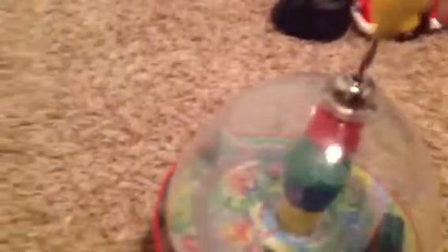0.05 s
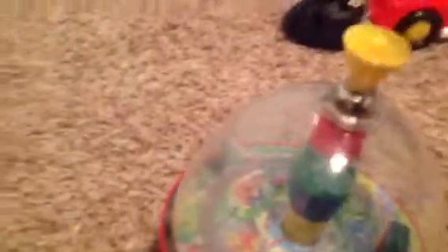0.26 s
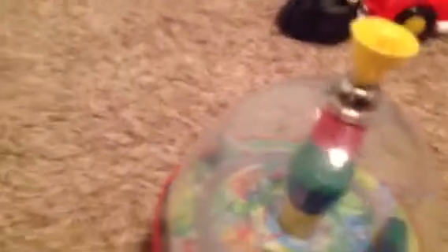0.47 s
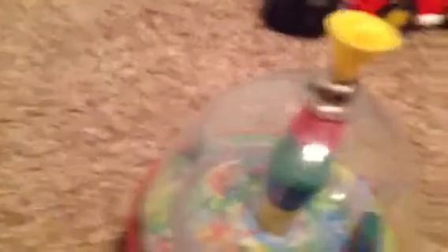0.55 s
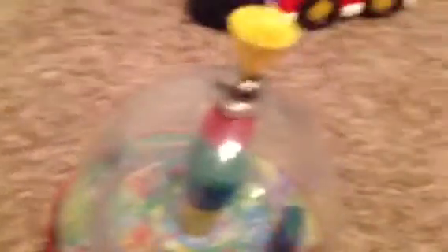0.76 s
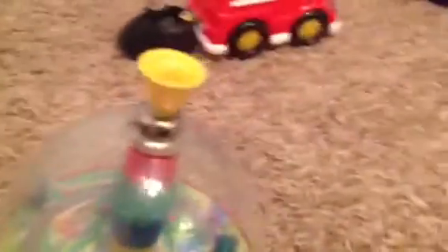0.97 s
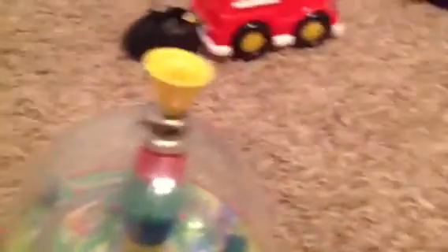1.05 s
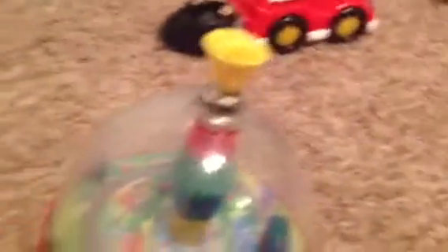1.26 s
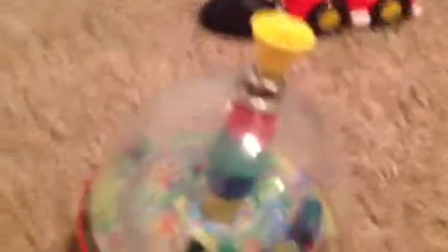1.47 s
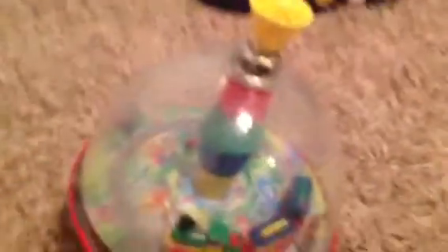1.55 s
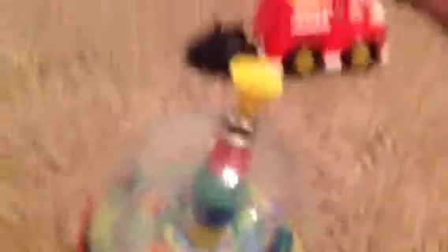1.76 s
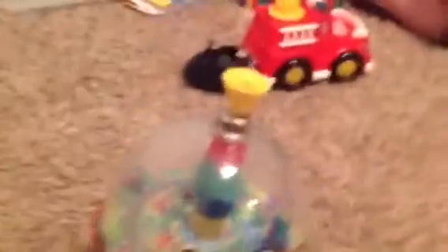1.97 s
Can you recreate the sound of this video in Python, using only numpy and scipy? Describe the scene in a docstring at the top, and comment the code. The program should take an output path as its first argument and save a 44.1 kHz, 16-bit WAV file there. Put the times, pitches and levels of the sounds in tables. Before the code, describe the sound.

Brief metallic clatter of a toy top's rod and handle, then faint whirring and soft bumps.

```python
"""A toy spinning top on a carpet, close by in a small room. Its twisted metal rod scrapes down through
the collar by stick-slip friction, then the handle knocks home and excites the modes of the plastic dome.
The rod rings in its bending modes and rattles loose in the collar. The top whirrs on faintly,
with scuffs on the carpet, soft bumps and small ticks, over a quiet background with a low hum."""
import sys
import numpy as np
from scipy import signal
from scipy.fft import rfft, irfft
from scipy.io import wavfile

SR = 44100
rng = np.random.default_rng(int(sys.argv[2]) if len(sys.argv) > 2 else 0)


def dump_mix(stems):
    """Bounce the given channels to the path in sys.argv[1] as a 16-bit WAV at rate SR."""
    frames = np.atleast_2d(stems).T  # one column per channel
    limited = np.clip(frames, -1, 1)  # hard clip at full scale
    pcm = np.round(limited * 32767).astype(np.int16)
    wavfile.write(sys.argv[1], SR, pcm)


N = 88200
SOFT_RISE_S = 0.0021


def undb(db):
    """Amplitude ratio of a level in decibels."""
    return 10 ** (np.asarray(db) / 20)


def unit(x):
    """Normalisation to a standard deviation of 1."""
    return x / (np.std(x) + 1e-12)


def times():
    """Uniform sampling: the time of each sample in seconds."""
    return np.arange(N) / SR


def envelope(points):
    """Gain interpolated in decibels through (time_s, level_db) points."""
    return undb(np.interp(times(), *np.array(points).T))


def colour(x, points):
    """Minimum-phase filter through (frequency_hz, gain_db) points, scaled to keep white noise's power."""
    hz, db = np.array(points).T
    bins_hz = np.arange(N + 1) * SR / (2 * N)
    gain = undb(np.interp(np.log(bins_hz + 1), np.log(hz), db))
    cepstrum = irfft(np.log(gain / np.sqrt(np.mean(gain ** 2))))
    cepstrum[1:N] *= 2  # folding the cepstrum makes the filter causal
    cepstrum[N + 1:] = 0
    return irfft(rfft(x, 2 * N) * np.exp(rfft(cepstrum)))[:N]


def noise_band(hz, width_hz):
    """Noise through one resonance; centred on 0 Hz it is a random fluctuation."""
    bins_hz = np.arange(N // 2 + 1) * SR / N
    spectrum = rfft(rng.standard_normal(N)) / (1 + (2 * (bins_hz - hz) / width_hz) ** 2)
    return unit(irfft(spectrum, N))


def decay(start, t60, hold=0, rise=1 / SR):
    """Exponential damping, 60 dB in t60 seconds, with a linear attack and a hold."""
    age = times() - start
    return np.clip(age / rise, 0, 1) * np.exp(-np.log(1000) * np.maximum(age - hold, 0) / t60)


def damped_tone(start, hz, t60):
    """A damped oscillator, pushed softly from rest."""
    return decay(start, t60, rise=SOFT_RISE_S) * np.sin(2 * np.pi * hz * (times() - start))


def ring(start, modes, hold=0, rise=1 / SR, detune=0.0043):
    """Modal superposition: half a second of damped modes in random phases, each slightly detuned."""
    first, out = int(start * SR), np.zeros(N)
    age = np.arange(SR // 2) / SR
    for hz, db, t60 in modes:
        cycles = hz * (1 + detune * rng.standard_normal()) * age + rng.random()
        shape = decay(0, t60, hold, rise)[:len(age)]
        out[first:first + len(age)] += undb(db) * shape * np.sin(2 * np.pi * cycles)
    return out


# Spectrum of the background noise: frequency_hz, gain_db
BACKGROUND_SPECTRUM = [(54, -52.5), (121, -3.5), (415, 0), (573, -0.5), (1180, -10.5), (2400, -15.5),
                       (3930, -16), (8320, -19), (15000, -28.5)]

def background():
    """Stationary noise: a quiet broadband floor and a narrow band heard as a low hum."""
    floor = undb(-57.5) * colour(rng.standard_normal(N), BACKGROUND_SPECTRUM)
    return floor + undb(-74.5) * noise_band(hz=120.8, width_hz=5.3)


def room(x, tail_db=-11):
    """Reverberation: convolution adds the short diffuse tail of a furnished room to the direct sound."""
    diffuse = colour(rng.standard_normal(N), [(200, -2), (3000, -5.5), (14000, -2.5)])
    tail = diffuse * decay(start=0.006, t60=0.31)
    tail /= np.sqrt(np.sum(tail ** 2))
    return x + undb(tail_db) * signal.fftconvolve(x, tail)[:N]


# Resonances of the spinning body: centre_hz, width_hz, level_db
BODY_RESONANCES = [(554, 163, -3.5), (900, 450, -9), (2870, 1900, -8.5)]
# Envelope of the whirr: time_s, level_db
WHIRR_LEVELS = [(0, -78), (0.5, -53.5), (0.9, -52.5), (1.02, -66), (1.2, -54), (1.42, -56), (1.7, -58.5),
                (2.0, -99)]

def whirr(rotation_hz=21.8, throb_db=1.5):
    """Amplitude modulation: the body hums in a few resonances and throbs as it turns."""
    hum = sum(undb(db) * noise_band(hz, width) for hz, width, db in BODY_RESONANCES)
    throb = undb(throb_db * noise_band(rotation_hz, width_hz=4.6))
    return hum * envelope(WHIRR_LEVELS) * throb


def brush(peak, db, rise, fall, spectrum, fibres_per_s=11000, tuft_db=2):
    """Shot noise: carpet fibres flick past, tuft by tuft, in one swell."""
    age = times() - peak
    swell = undb(db) * np.exp(-np.maximum(-age / rise, age / fall))
    fibres = rng.standard_normal(N) * (rng.random(N) < fibres_per_s / SR)
    tufts = undb(tuft_db * noise_band(0, width_hz=197))
    return colour(swell * unit(fibres * tufts), spectrum)


# Light rustles of the carpet: peak_s, level_db, rise_s, fall_s
RUSTLE_SWELLS = [(0.947, -52, 0.043, 0.034), (1.801, -52, 0.0098, 0.015), (1.86, -53, 0.044, 0.046)]
# Spectrum of a rustle: frequency_hz, gain_db
RUSTLE_SPECTRUM = [(500, 4), (3000, 1.5), (9000, -4), (15000, -14)]

def rustles():
    """Broadband friction noise: faint swells of brushed fibres that reach into the high treble."""
    return sum(brush(*swell, RUSTLE_SPECTRUM) for swell in RUSTLE_SWELLS)


# Scuffs on the carpet: peak_s, level_db, rise_s, fall_s, centre_hz
SCUFF_SWELLS = [(0.768, -50, 0.096, 0.048, 2900), (1.051, -51.5, 0.0093, 0.033, 2430),
                (1.102, -41.5, 0.0039, 0.014, 2100), (1.117, -39.5, 0.011, 0.024, 2000),
                (1.326, -47.5, 0.0066, 0.049, 2110)]
# Spectrum of a scuff: ratio_to_centre, gain_db
SCUFF_SPECTRUM = [(.1, -6.5), (.4, -4), (.7, 5), (1.6, 1), (2.4, -10.5), (4.5, -21), (7, -32)]

def scuffs():
    """Band-shaped friction noise: each scuff scales one spectrum to its own centre frequency."""
    return sum(brush(*swell, [(centre_hz * ratio, db) for ratio, db in SCUFF_SPECTRUM])
               for *swell, centre_hz in SCUFF_SWELLS)


# Soft bumps on the carpet: start_s, level_db, pitch_hz, t60_s
CARPET_BUMPS = [(0.937, -42.5, 223, 0.12), (1.047, -38, 345, 0.045), (1.061, -45, 210, 0.064),
                (1.087, -40.5, 407, 0.19), (1.103, -42.5, 210, 0.13), (1.221, -31, 286, 0.039),
                (1.516, -23, 135, 0.032), (1.5221, -25.5, 241, 0.081), (1.5311, -29, 406, 0.018),
                (1.5636, -33, 217, .1), (1.657, -41, 258, 0.11), (1.802, -45.5, 270, 0.1),
                (1.826, -39, 317, 0.05), (1.843, -40.5, 275, 0.078)]
# Spectrum of a thud: frequency_hz, gain_db
THUD_SPECTRUM = [(30, -50), (70, -14), (140, 1.5), (300, 3), (700, -7.5), (1500, -20.5), (5000, -32.5)]

def bumps(thud_db=-5.5):
    """Cushioned impacts: each gives a dull thud and one damped low tone."""
    tones = sum(undb(db) * damped_tone(start, hz, t60) for start, db, hz, t60 in CARPET_BUMPS)
    shape = sum(undb(db) * decay(start, t60, rise=SOFT_RISE_S) for start, db, _, t60 in CARPET_BUMPS)
    return tones + undb(thud_db) * colour(shape * rng.standard_normal(N), THUD_SPECTRUM)


# Small plastic ticks: start_s, level_db, pitch_hz, rise_s, crack_db
PLASTIC_TICKS = [(0.9654, -49, 5500, 0.0011, 4), (1.2175, -37.5, 1220, 0.00068, -10),
                 (1.3232, -43, 1870, 0.00088, -8.5), (1.5145, -38, 2040, 0.00072, 1),
                 (1.5222, -33, 2420, .0007, -1), (1.5256, -36.5, 2670, .0008, 0),
                 (1.5613, -28.5, 1880, 0.00091, -6), (1.8261, -26.5, 2150, 0.00034, -12)]
# Spectrum of a tick's crack: frequency_hz, gain_db
TICK_SPECTRUM = [(200, -6), (1000, -2.5), (2800, 1), (6000, -4), (15000, -35)]

def ticks(overtone_ratio=1.78, overtone_db=-10.5):
    """Heavily damped vibration: hollow tocks with one inharmonic overtone, each with a noisy crack of its own
    level."""
    tocks, cracks = 0, 0
    for start, db, hz, rise, crack_db in PLASTIC_TICKS:
        age = np.maximum(times() - start, 0)
        shape = undb(db) * (age / rise * np.exp(1 - age / rise)) ** 2
        phase = 2 * np.pi * hz * age
        tocks += shape * (np.sin(phase) + undb(overtone_db) * np.sin(overtone_ratio * phase))
        cracks += shape * undb(crack_db)
    return tocks + colour(cracks * rng.standard_normal(N), TICK_SPECTRUM)


# Modes of the collar and handle: frequency_hz, level_db, t60_s
COLLAR_MODES = [(1713, -13.5, 0.1), (1764, -15.5, 0.15), (1973, -15, 0.2), (2465, -17, 0.23),
                (3348, -20.5, 0.29), (4106, -14.5, 0.049), (4635, -23.5, 0.14)]

def collar(start, rise=1 / SR):
    """Impulse response: the collar and handle vibrate freely after one contact."""
    return ring(start, COLLAR_MODES, rise=rise)


# Envelope of the rod's scrape in the collar: time_s, level_db
SCRAPE_LEVELS = [(0, -31), (0.008, -33.5), (0.035, -48), (0.07, -40), (0.112, -37), (0.132, -38.5),
                 (0.15, -42.5), (0.168, -35.5), (0.2, -43.5), (0.33, -39), (0.40, -53), (0.51, -48.5),
                 (0.57, -70)]
# Spectrum of the scrape: frequency_hz, gain_db
SCRAPE_SPECTRUM = [(59, -59), (100, -30), (146, -17.5), (257, 0.5), (482, -12), (748, -6.5), (1020, -10.5),
                   (1530, -2), (3460, -10), (9070, -30), (11000, -32), (15000, -37)]

def scrape(slips_per_s=5000, squeak_peak_s=0.108, squeak_width_s=0.034):
    """Stick-slip friction: dense clicks ring the collar, with a faint, rough squeak."""
    slips = unit(rng.standard_normal(N) * (rng.random(N) < slips_per_s / SR))
    ringing = undb(-8.5) * unit(signal.fftconvolve(slips, collar(0, rise=SOFT_RISE_S))[:N])
    squeak_swell = undb(-52) * np.exp(-abs(times() - squeak_peak_s) / squeak_width_s)
    squeak = squeak_swell * noise_band(hz=10470, width_hz=400)
    return envelope(SCRAPE_LEVELS) * (colour(slips, SCRAPE_SPECTRUM) + ringing) + squeak


# Contacts of the loose rod with the collar: start_s, level_db, contact_s
RATTLE_CONTACTS = [(0.2621, -22.5, 0.0023), (0.3186, -23, 0.0027), (0.3221, -20, 0.0013),
                   (0.364, -25, 0.0028), (0.418, -39, 0.0015), (0.4261, -29, 0.0059),
                   (0.4432, -32.5, 0.0021), (0.498, -44.5, 0.004)]
# Spectrum of the chatter: frequency_hz, gain_db
RATTLE_SPECTRUM = [(200, -30), (1000, -12), (1700, 3.5), (2800, 0.5), (4300, 1.5), (5500, -7.5), (8500, -8),
                   (11500, -9.5), (15000, -16.5)]

def rattle(collar_db=-4):
    """Intermittent contact: short bursts of metal chatter excite the collar's modes."""
    chatter, ringing = 0, 0
    for start, db, contact_s in RATTLE_CONTACTS:
        shape = decay(start, t60=0.02, hold=contact_s) + undb(-17) * decay(start, t60=0.11)
        chatter += undb(db) * shape * rng.standard_normal(N)
        ringing += undb(db + collar_db) * collar(start)
    return colour(chatter, RATTLE_SPECTRUM) + ringing


# Hard contacts that set the rod ringing: start_s, level_db
ROD_STRIKES = [(0.2133, -15.5), (0.264, -28.5), (0.3, -35.5), (0.324, -44)]
# Bending modes of the rod: frequency_hz, level_db, t60_s
ROD_MODES = [(4384, 0.5, 0.038), (5750, -21, 0.17), (7730, -22.5, 0.13), (9890, -18, 0.064),
             (13700, -20, 0.084)]

def rod(rise_s=0.0038, hold_s=0.013, waver_db=2, waver_rad=0.39):
    """Bending vibration: the rod's lowest mode wavers; the upper ones jangle against the collar."""
    lowest, *upper = [sum(undb(db) * ring(start, [mode], hold_s, rise_s) for start, db in ROD_STRIKES)
                      for mode in ROD_MODES]
    waver_gain = undb(waver_db * noise_band(0, width_hz=150))
    waver_phase = waver_rad * noise_band(0, width_hz=150)
    singing = (signal.hilbert(lowest) * waver_gain * np.exp(1j * waver_phase)).real
    # Random modulation spreads each upper mode into a band.
    jangle = undb(3.5) * sum(mode * noise_band(0, width_hz=430) for mode in upper)
    jingle_shape = sum(undb(db) * decay(start, t60=0.14, rise=rise_s) for start, db in ROD_STRIKES)
    jingle = undb(-15.5) * jingle_shape * noise_band(hz=8950, width_hz=12000)
    return singing + jangle + jingle


def creak(peak_s=0.2788, pitch_at_peak_hz=622.4, glide_s=0.00653, width_s=0.0044):
    """An exponential chirp: a brief tone falls in pitch as the handle settles."""
    age = np.clip(times() - peak_s, -0.03, 0.03)
    cycles = pitch_at_peak_hz * glide_s * np.exp(-age / glide_s)
    return undb(-18.5) * np.exp(-(age / width_s) ** 2) * np.sin(2 * np.pi * cycles)


def shell_dispersion(x, delay_at_1khz_s=0.002245):
    """Dispersion of bending waves in the shell: high tones arrive first, low ones later."""
    hz = np.arange(N + 1) * SR / (2 * N)
    lag_cycles = 2 * delay_at_1khz_s * np.sqrt(1000 * hz)
    return irfft(rfft(x, 2 * N) * np.exp(-2j * np.pi * lag_cycles))[:N]


# Knocks of the handle on the dome: start_s, level_db, treble_db, hollow_db
HANDLE_KNOCKS = [(0.2112, -12.5, 2, -4), (0.2136, -19.5, 1.5, -33), (0.2515, -21.5, -1.5, 1.5),
                 (0.2718, -24.5, 4, -8), (0.277, -29.5, -26, -1.5), (0.2857, -27.5, 5, -2),
                 (0.3019, -31, 5, 3)]
# Spectrum of a knock: frequency_hz, gain_db
KNOCK_SPECTRUM = [(80, -39), (140, -12), (220, 12.5), (400, 3.5), (750, -1), (1300, 1.5), (2600, 2),
                  (3400, -3), (5000, -16.5), (14000, -25.5)]
# Modes of the plastic dome: frequency_hz, level_db, t60_s
DOME_MODES = [(274, -13, 0.18), (319.3, -18, 0.28), (423, -21, 0.072), (745, -20.5, 0.17), (1230, -12, 0.1),
              (1406, -20.5, 0.08), (2408, -23, 0.12), (2480, -17, 0.11), (2696, -31, 0.17)]

def handle_knocks(treble_above_hz=1500):
    """Impact excitation: each blow spreads through the shell, cracks, and rings the dome hollowly."""
    knocks = 0
    for start, db, treble_db, hollow_db in HANDLE_KNOCKS:
        blow = undb(18.5) * shell_dispersion(np.sinc((times() - start) * SR))
        crack_shape = undb(-1.5) * decay(start, t60=0.015) + undb(-15.5) * decay(start, t60=0.16)
        crack = crack_shape * rng.standard_normal(N)
        hit = colour(blow + crack, KNOCK_SPECTRUM) + undb(0.5) * ring(start, DOME_MODES)
        low = signal.lfilter(*signal.butter(1, treble_above_hz, fs=SR), hit)
        treble = undb(treble_db) * (hit - low)
        hollow = undb(hollow_db) * damped_tone(start, hz=283, t60=0.064)
        knocks += undb(db) * (low + treble + hollow)
    return knocks


def scene():
    """Superposition: the top and the carpet sound in the room, over the background, in one channel."""
    top = handle_knocks() + creak() + rod() + rattle() + scrape() + bumps() + ticks() + whirr()
    carpet = scuffs() + rustles()
    return (background() + room(top + carpet))[None]


def record(dry, low_cut_hz=106, high_cut_hz=15100):
    """Band limiting: a gentle high-pass thins the deep bass and a steep low-pass cuts the top octave."""
    thinned = signal.sosfilt(signal.butter(2, low_cut_hz, "high", fs=SR, output="sos"), dry)
    return signal.sosfilt(signal.ellip(8, 0.2, 70, high_cut_hz, fs=SR, output="sos"), thinned)


dry = scene()
out = record(dry)
dump_mix(out)
```